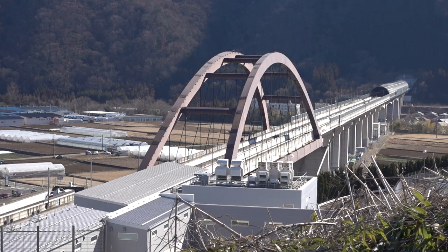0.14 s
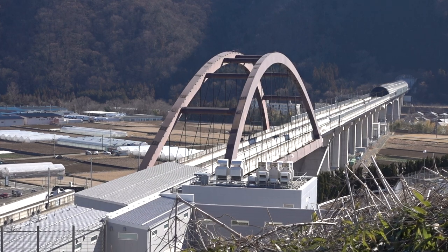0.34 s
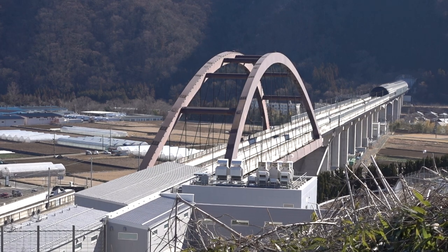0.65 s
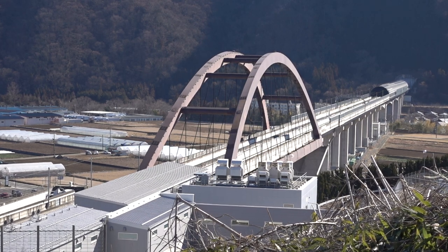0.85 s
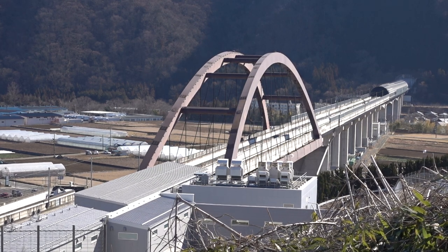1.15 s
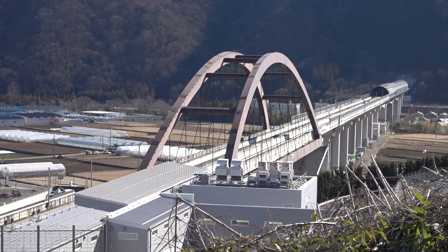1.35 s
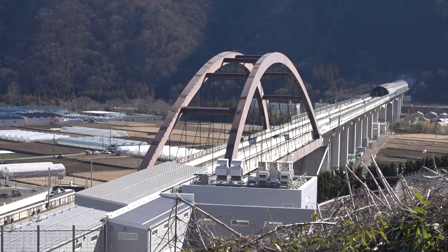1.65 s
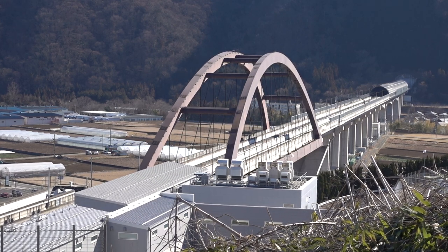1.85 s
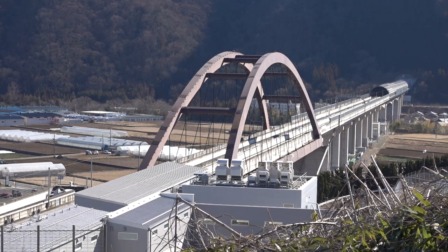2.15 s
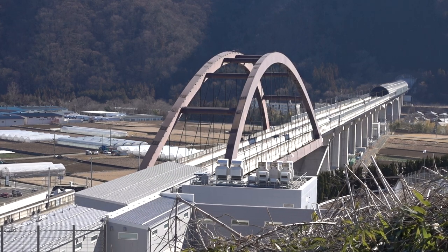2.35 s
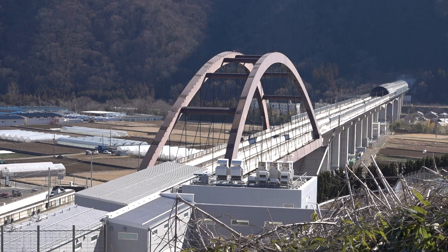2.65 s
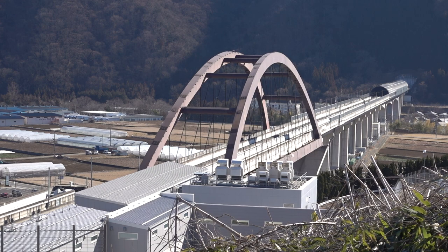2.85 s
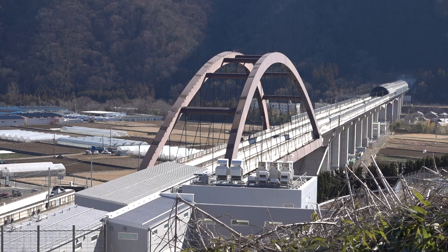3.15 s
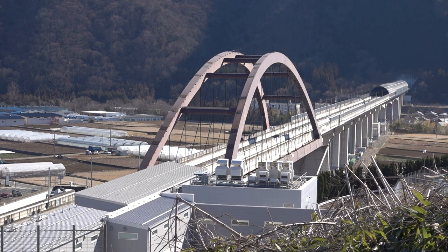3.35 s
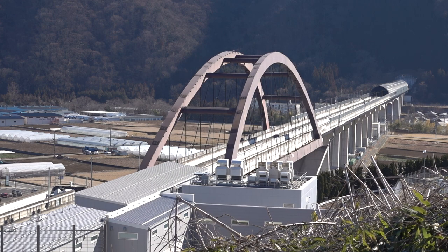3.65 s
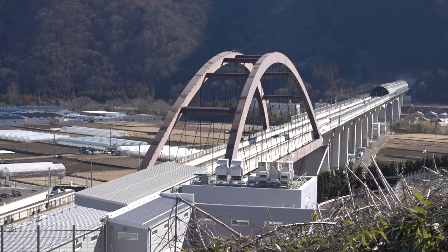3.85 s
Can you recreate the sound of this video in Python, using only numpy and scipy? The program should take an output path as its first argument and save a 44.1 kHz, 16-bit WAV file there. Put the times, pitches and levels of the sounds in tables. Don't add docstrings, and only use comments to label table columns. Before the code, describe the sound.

Loud broadband train roar with sharp airy hiss, already at full strength, drops and darkens as the train leaves; a low guideway hum lingers, then tiny bird chips and faint microphone hiss in an open valley.

```python
import sys
import numpy as np
from scipy import signal
from scipy.fft import rfft, irfft
from scipy.io import wavfile

SR = 44100
rng = np.random.default_rng(int(sys.argv[2]) if len(sys.argv) > 2 else 0)


def decibels_to_gain(level_db):
    exponent = np.asarray(level_db, float) / 20
    return 10 ** exponent


def generate_wav(sig):
    pcm = np.round(np.clip(np.atleast_2d(sig).T, -1, 1) * 32767).astype(np.int16)
    wavfile.write(sys.argv[1], SR, pcm)


N = 176400
HZ = np.maximum(np.arange(N // 2 + 1) * SR / N, 1)


def in_time(rows):
    seconds, *columns = np.transpose(rows)
    return [np.interp(np.arange(N) / SR, seconds, column) for column in columns]


def at_hz(points, hz):
    table_hz, value = np.transpose(points)
    return np.interp(np.log(hz), np.log(table_hz), value)


def drift(rate_hz):
    r = np.exp(-80 * np.pi * rate_hz / SR)
    white = rng.standard_normal(N // 40 + 2002)
    slow = signal.lfilter([1], [1, -2 * r, r * r], white)[2000:]
    return np.interp(np.arange(N) / 40, np.arange(len(slow)), slow / slow.std())


def narrow(hz, width_hz):
    r = np.exp(-np.pi * width_hz / SR)
    x = rng.standard_normal(N + SR)
    for _ in range(2):
        x = signal.lfilter([1, 0, -1], [1, -2 * r * np.cos(2 * np.pi * hz / SR), r * r], x)
    x = x[SR:]
    return x / x.std()


# time in seconds, roar level in dB, brightness in dB, left minus right in dB.
PASSAGE = [(0.0, -16.5, -6.5, 4), (0.09, -15.5, -6.5, 4.0), (0.23, -18.5, -5.5, 4.0),
           (0.28, -16.5, -6.5, 4.0), (0.77, -16.5, -6, 4), (1.07, -18.5, -7.5, 6), (1.1, -20.5, -6.5, 4),
           (1.59, -26, -11.5, 5.5), (1.61, -25.5, -10.5, 5.5), (2.29, -35.5, -16, 4), (2.93, -40, -17, 3.5),
           (3.77, -43, -19.5, 4.5), (3.8, -44, -17.5, 4.0), (4.0, -44.5, -18, 4.5)]


def passing():
    near_bright_db, fade_span_db = -6.5, 17
    level_db, bright_db, pan_db = in_time(PASSAGE)
    return level_db, (near_bright_db - bright_db) / fade_span_db, pan_db


# frequency in Hz, shared part of the power from 0 to 1.
LIKENESS = [(270, 1), (400, .975), (700, .95), (1200, .83), (2400, .6), (4500, .68), (8000, .5),
            (14000, .35)]


def stereo_spectrum():
    shared, *own = rfft(rng.standard_normal((3, N))) * np.sqrt(SR / 2)
    alike = np.clip(at_hz(LIKENESS, HZ), 0, 1)
    return np.sqrt(alike) * shared + np.sqrt(1 - alike) * np.array(own)


# time in seconds, level in dB.
SLIPSTREAM = [(0.0, -40), (0.04, -38.5), (0.16, -43), (0.22, -36.5), (0.36, -44), (0.38, -40), (0.53, -45),
              (0.8, -42), (0.83, -44.5), (0.94, -40), (0.99, -44), (1.08, -39.5), (1.14, -44),
              (1.63, -65.5), (1.68, -61), (1.74, -68), (2.1, -85)]
# frequency in Hz, density in dB per Hz.
ROAR_SPECTRUM = [(25, -33), (140, -8), (360, -8), (600, -1), (1400, -3.5), (2050, -6.5), (3000, -11),
                 (9000, -29.5)]
# frequency in Hz, density in dB per Hz.
HISS_SPECTRUM = [(3000, 5), (6000, 3), (9000, 2), (12000, 3), (15500, -6)]
# frequency in Hz, loss in dB.
AIR_LOSS = [(80, -8.5), (160, 4), (300, 5.5), (600, -6), (1200, 3), (2300, 18.5), (3600, 30), (6000, 35.5)]
# frequency in Hz, gain in dB.
GROUND_BANDS = [(900, -1), (1300, 4), (1800, -3.5), (2400, 4.5), (3400, -2), (4250, 2), (5600, -6),
                (9000, -2.5)]


def roar():
    roar_db, hiss_ref_db = -29, -38
    ground_s, ground_span_s = 1.82, 0.63
    gust_db, patch_db = 1.5, 0.58
    level_db, distance, _ = passing()
    hiss_db, = in_time(SLIPSTREAM + [(2.5, -100), (4, -110)])
    ground = np.exp(-((np.arange(N) / SR - ground_s) / ground_span_s) ** 2)
    pair = stereo_spectrum()
    gust = gust_db * drift(26)
    out = np.zeros((2, N))
    for hz in 20 * 2 ** (np.arange(40) / 4):
        mask = np.clip(1 - 4 * np.abs(np.log2(HZ / hz)), 0, 1)
        body_db = level_db + roar_db + at_hz(ROAR_SPECTRUM + [(16000, -54)], hz)
        body_db = body_db - distance * at_hz(AIR_LOSS, hz) + ground * at_hz(GROUND_BANDS, hz)
        air_db = hiss_db + hiss_ref_db + at_hz([(1000, -60)] + HISS_SPECTRUM, hz) + gust
        level = np.hypot(decibels_to_gain(body_db), decibels_to_gain(air_db))
        out += level * decibels_to_gain(patch_db * drift(2.3)) * irfft(pair * mask, N)
    return out


# time in seconds, tone level in dB, octave level in dB.
HUM = [(0, -47, -60), (.7, -56, -48), (.87, -28.5, -42), (.94, -38.5, -57), (1.05, -28, -48),
       (1.3, -39, -52), (1.43, -33, -40), (1.54, -43, -46), (1.6, -33.5, -56), (1.75, -32, -52),
       (1.83, -45, -41), (2.0, -46, -42), (2.13, -44.5, -57), (2.25, -53, -57), (3.2, -58.5, -71),
       (3.4, -56, -73), (3.85, -57.5, -65), (4, -66, -68)]
# frequency in Hz, width in Hz, dB re roar near, dB re roar far.
RINGS = [(642, 11, -19, -1), (612.2, 22, -16, -7.5), (546, 94, -15, -12.5), (250.6, 82, -19, -14.5),
         (328.2, 7.6, -26, -16), (1533, 400, -15, -38), (2770, 710, -17, -36)]


def guideway():
    hum_hz, wander_hz = 222.3, 1.57
    level_db, distance, _ = passing()
    tone_db, octave_db = in_time(HUM)
    phase = 2 * np.pi * np.cumsum(hum_hz + wander_hz * drift(17.4)) / SR
    hum = decibels_to_gain(tone_db) * np.sin(phase) + decibels_to_gain(octave_db) * np.sin(2 * phase)
    out = np.sqrt(2) * hum
    for hz, width_hz, near_db, far_db in RINGS:
        ring_db = level_db + near_db + (far_db - near_db) * distance
        out += decibels_to_gain(ring_db) * narrow(hz, width_hz)
    return out


# time in seconds, peak level in dB, pitch in Hz.
CHIPS = [
    (2.289, -65, 6950),
    (2.779, -60, 6550),
    (3.579, -62, 6600),
]


def bird():
    chip_s, dip_hz = .011, 1000
    echo_db, echo_t60_s = -34, .9
    u = np.arange(int(chip_s * SR)) / (chip_s * SR)
    t = np.arange(SR // 2) / SR
    out = np.zeros((2, N + SR))
    for start_s, db, hz in CHIPS:
        pitch_hz = hz + dip_hz * (2 * np.abs(2 * u - .9) - 1) / 2
        chip = decibels_to_gain(db) * np.sin(np.pi * u) ** .5 * np.sin(2 * np.pi * np.cumsum(pitch_hz) / SR)
        echo = decibels_to_gain(echo_db - 60 * t / echo_t60_s) * rng.standard_normal((2, len(t)))
        echo[0, 1] = echo[1, 0] = 1
        sound = signal.fftconvolve(echo, chip[None], axes=1)
        start = int(start_s * SR)
        out[:, start:start + sound.shape[1]] += sound
    return out[:, :N]


def puff():
    puff_s, length_s, puff_db, puff_hz = 3.752, .012, -51, 180
    t = np.arange(N) / SR - puff_s
    push = decibels_to_gain(puff_db) * np.exp(-(t / length_s) ** 2) * narrow(puff_hz, 250)
    return push * [[1], [-.4]]


def scene():
    mean_pan_db = 4.2
    train = roar() + guideway()
    mids = signal.sosfiltfilt(signal.butter(2, 400, "high", fs=SR, output="sos"), train)
    swing = decibels_to_gain((passing()[2] - mean_pan_db) / 2 * np.array([[1], [-1]]))
    return train + (swing - 1) * mids + bird() + puff()


# frequency in Hz, left minus right in dB.
TILT = [(60, 0), (260, 0), (380, 1.8), (700, 3.3), (1290, 4.9), (2400, 5.4), (4400, 4.4), (15000, -1.5)]
# frequency in Hz, left lead in radians.
LEAD = [(300, 0), (1290, .15), (1810, .8), (2240, .7), (3010, 1.5), (6800, 2.7), (9650, 3.3), (15300, 8.9)]


def ports(dry):
    padded = np.concatenate([dry, dry[:, ::-1]], axis=1)
    hz = np.maximum(np.arange(N + 1) * SR / (2 * N), 1)
    half = decibels_to_gain(at_hz(TILT, hz) / 2) * np.exp(.5j * np.interp(hz, *np.transpose(LEAD)))
    return irfft(rfft(padded) * [half, 1 / half])[:, :N]


# frequency in Hz, density in dB per Hz.
MIC_NOISE = [(25, -93), (100, -101), (1000, -110), (3500, -111), (5500, -109.5), (8000, -110.5),
             (11000, -112.5), (16000, -114)]


def port_hiss():
    own = rfft(rng.standard_normal((2, N)))
    own[1, HZ < 300] = own[0, HZ < 300]
    return irfft(own * np.sqrt(SR / 2) * decibels_to_gain(at_hz(MIC_NOISE, HZ)), N)


def roll_off(x):
    return signal.sosfilt(signal.butter(12, 15760, fs=SR, output="sos"), x)


def record(dry):
    mix = ports(dry) + port_hiss()
    return roll_off(mix)


dry = scene()
out = record(dry)
generate_wav(out)
```